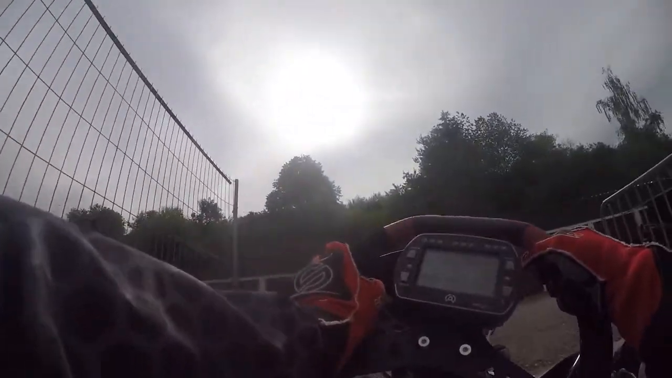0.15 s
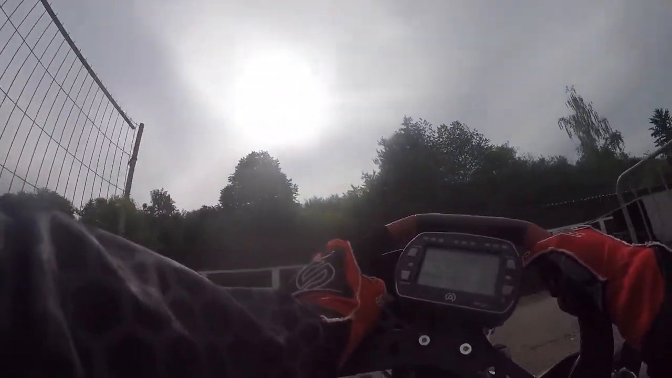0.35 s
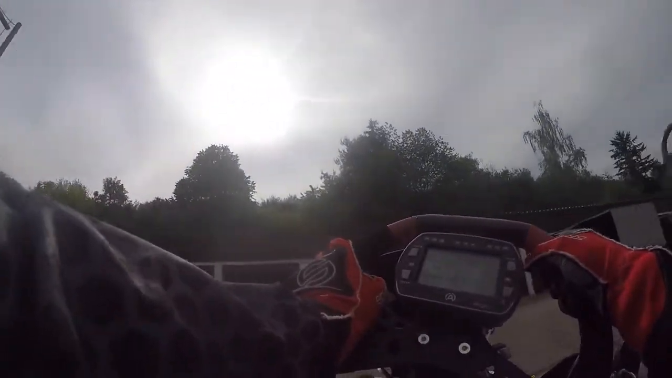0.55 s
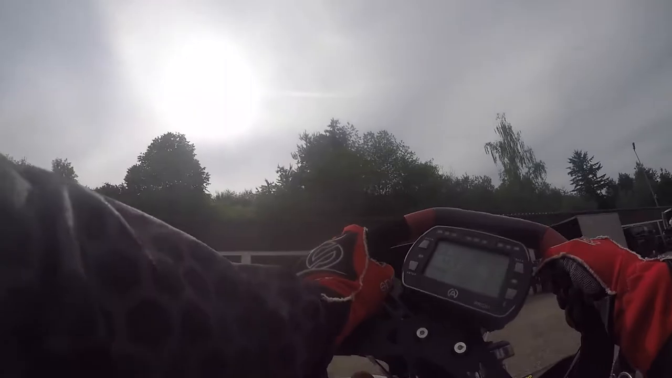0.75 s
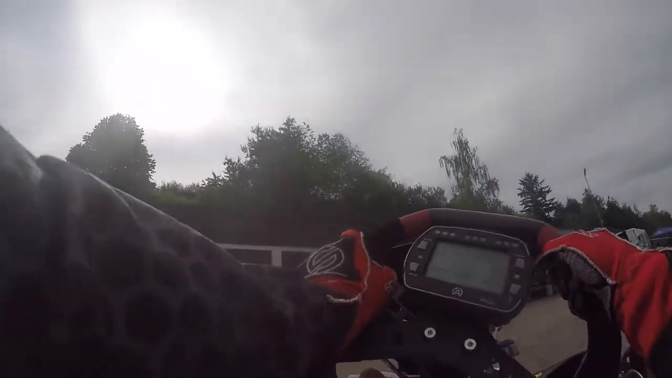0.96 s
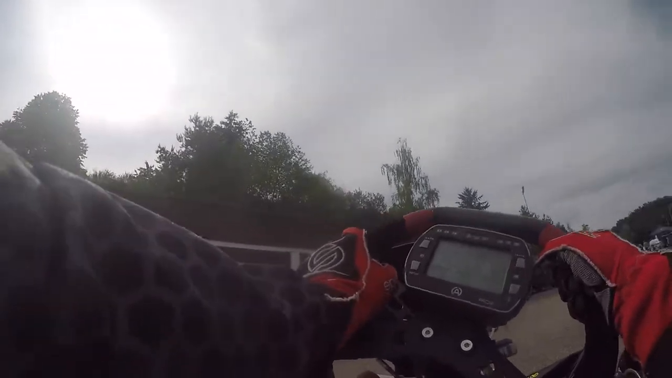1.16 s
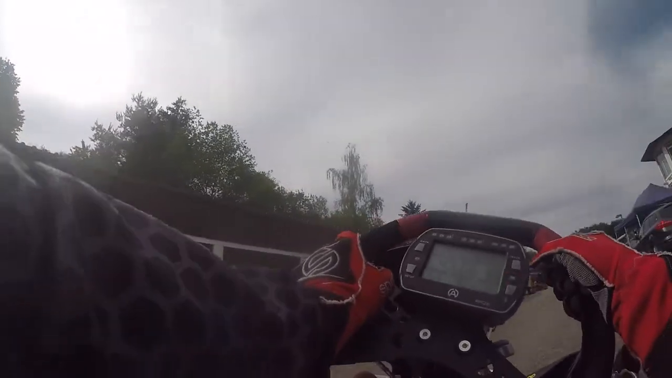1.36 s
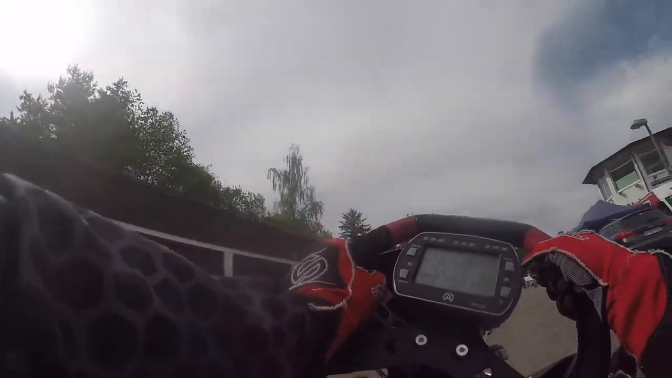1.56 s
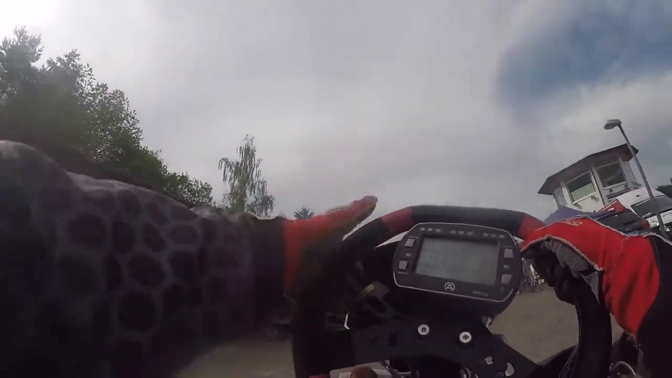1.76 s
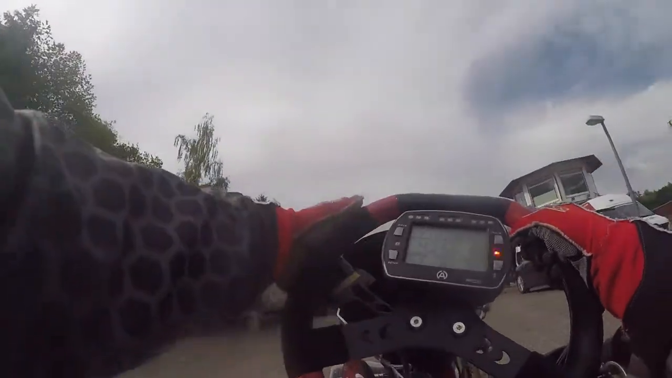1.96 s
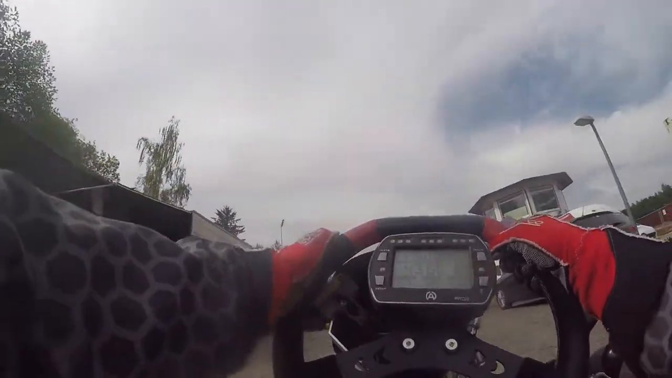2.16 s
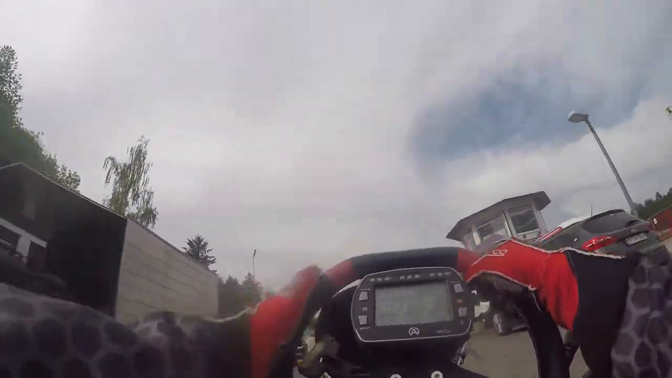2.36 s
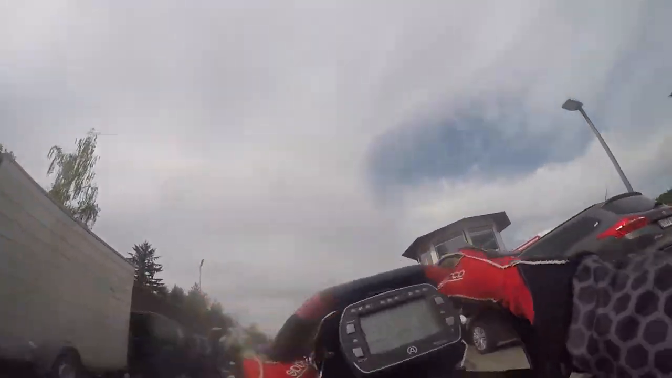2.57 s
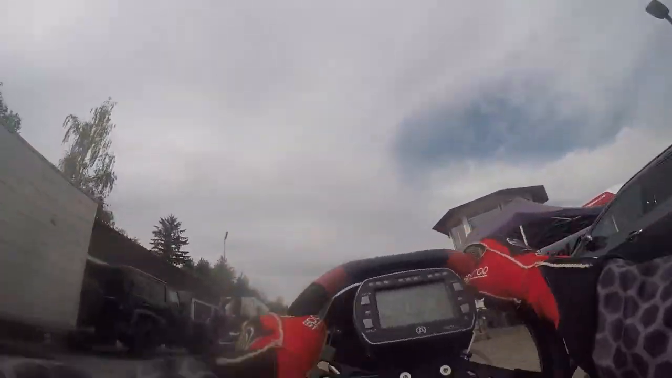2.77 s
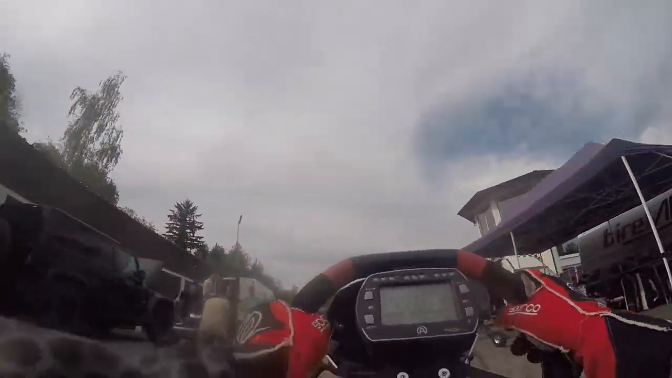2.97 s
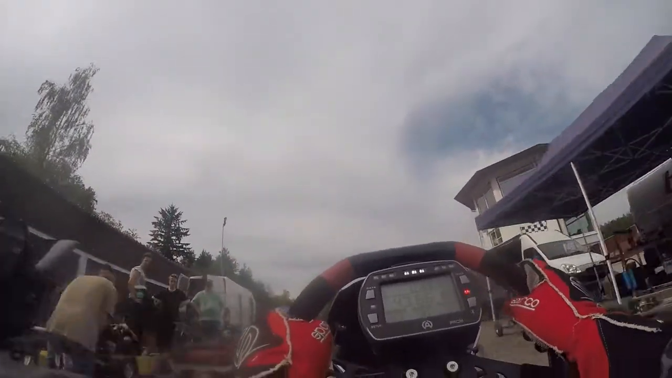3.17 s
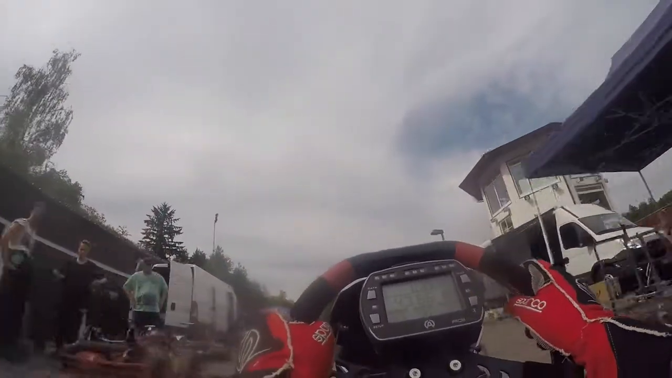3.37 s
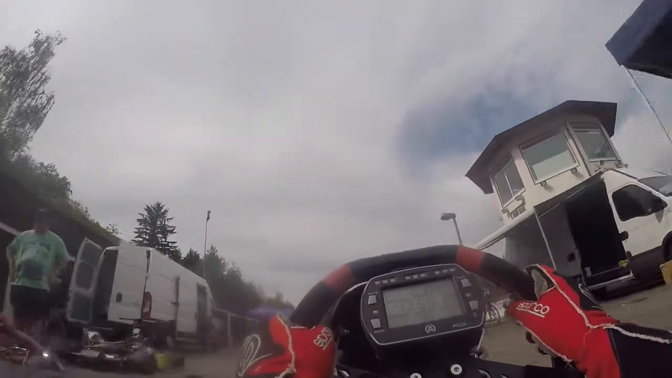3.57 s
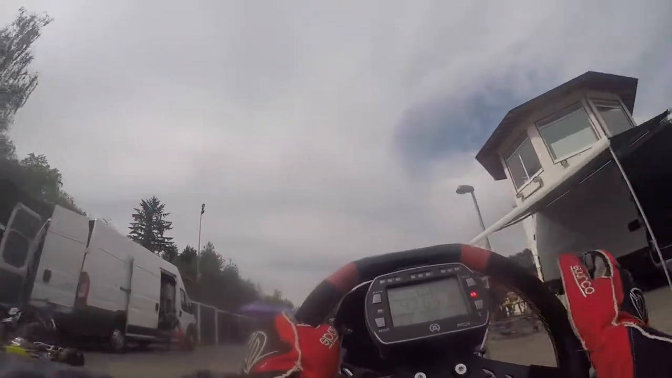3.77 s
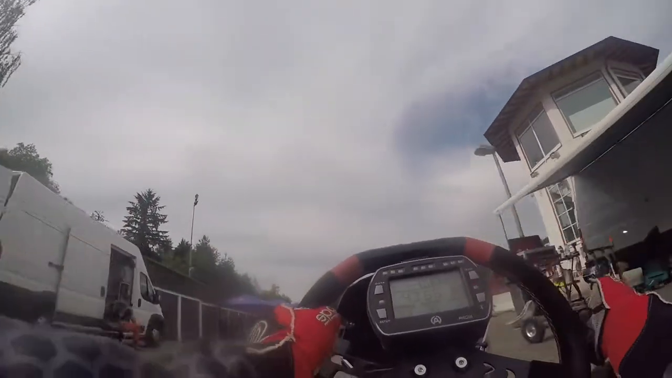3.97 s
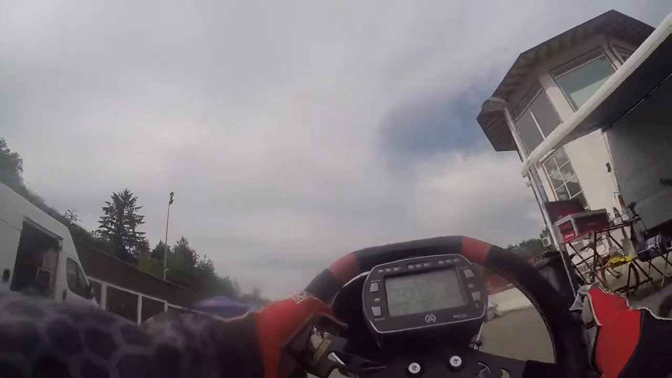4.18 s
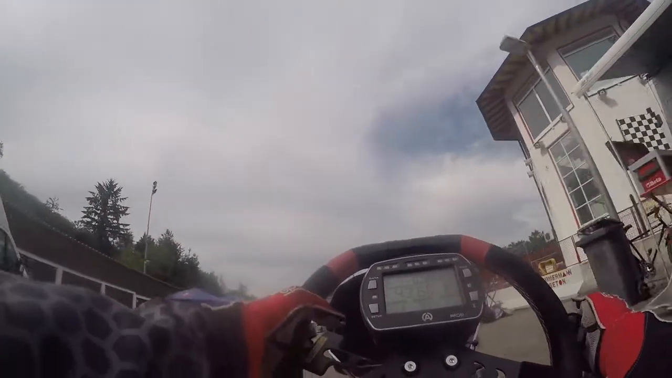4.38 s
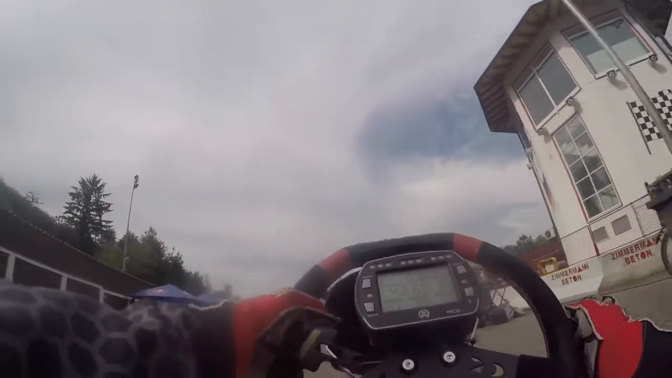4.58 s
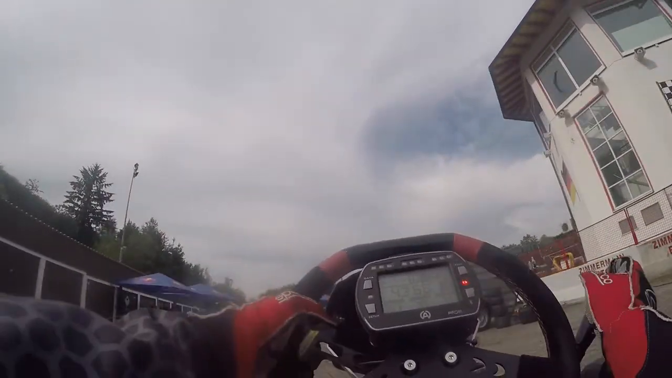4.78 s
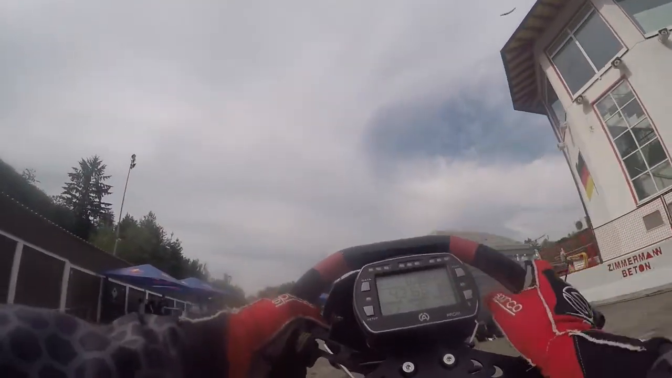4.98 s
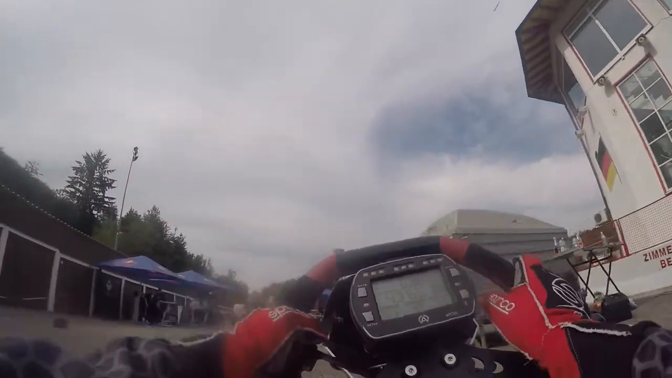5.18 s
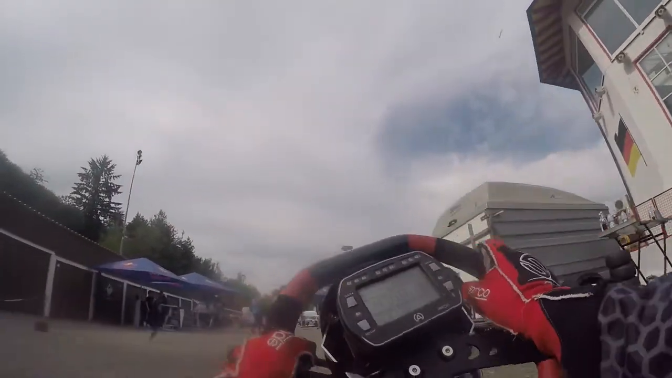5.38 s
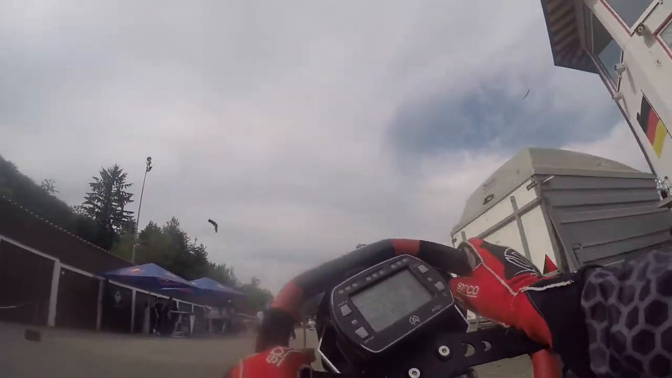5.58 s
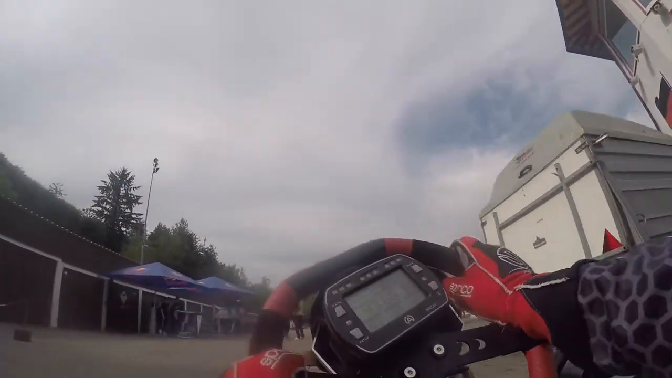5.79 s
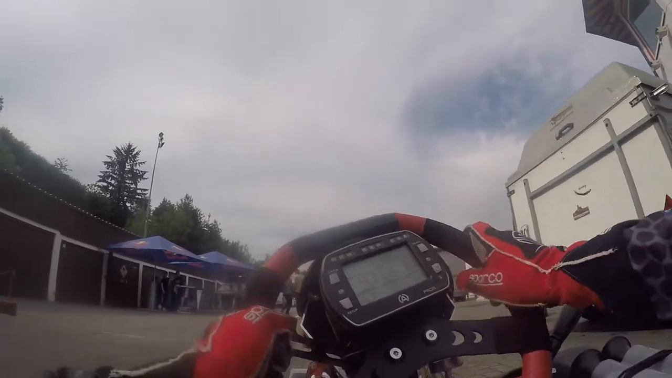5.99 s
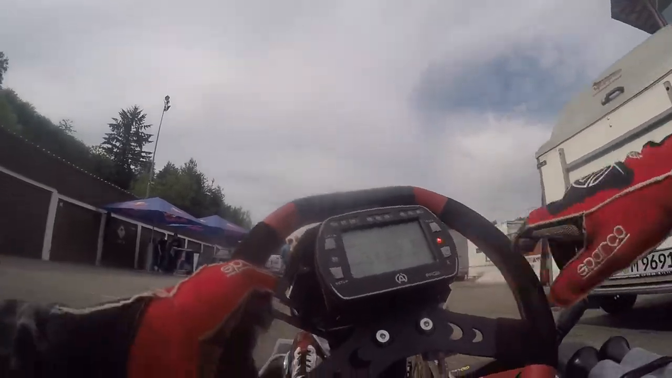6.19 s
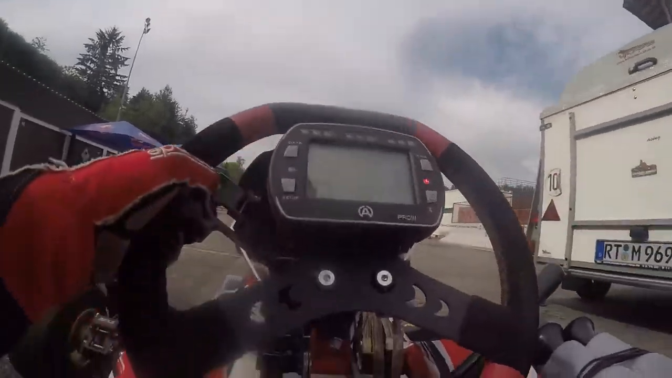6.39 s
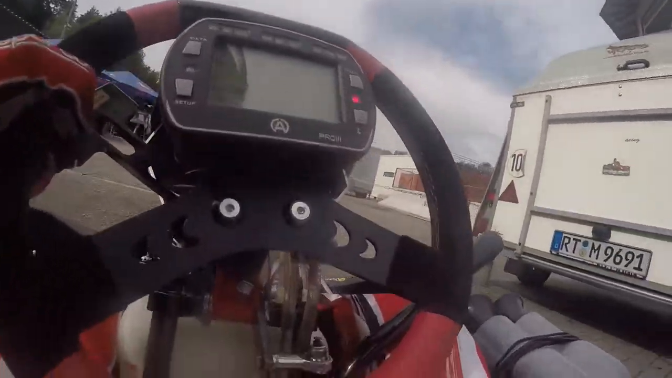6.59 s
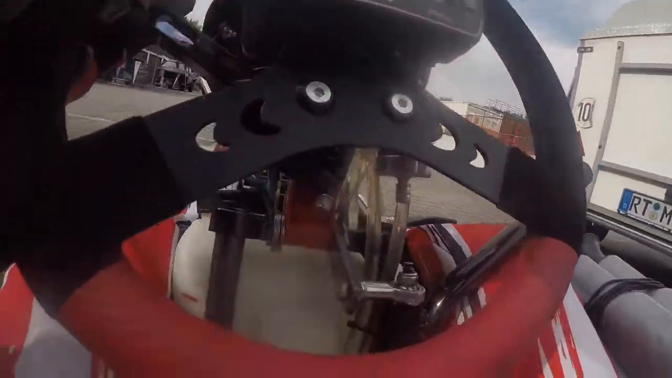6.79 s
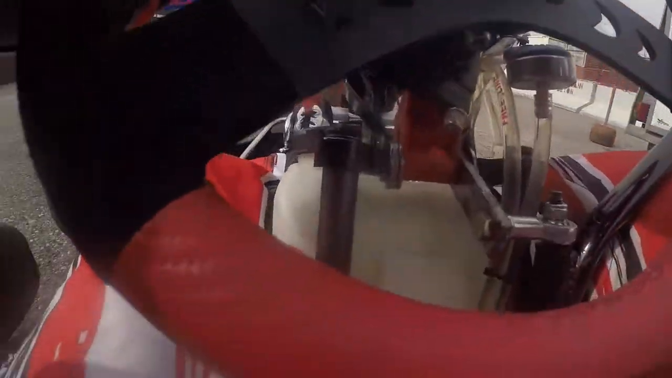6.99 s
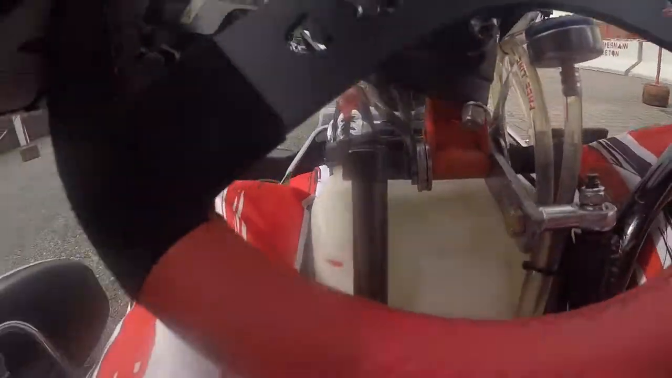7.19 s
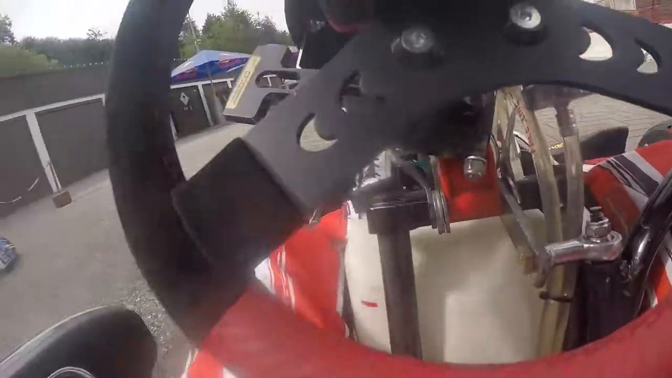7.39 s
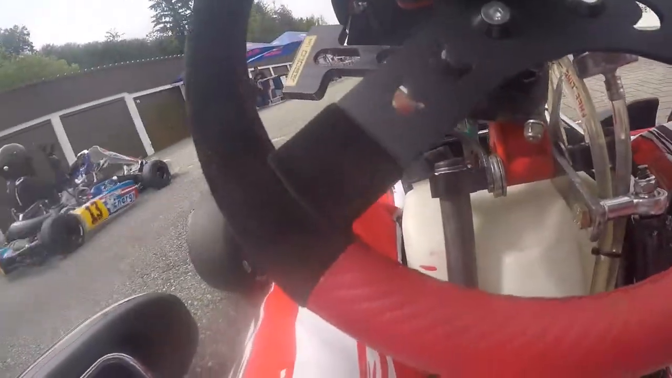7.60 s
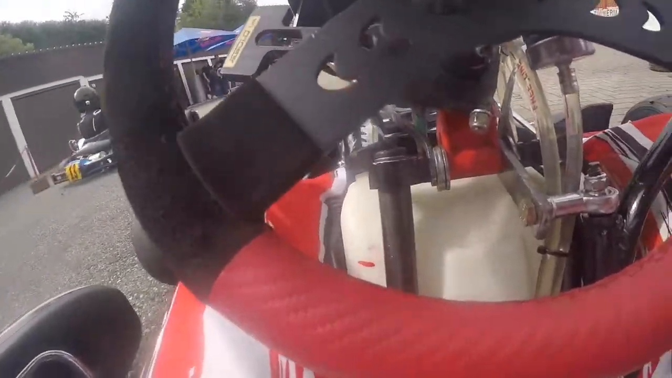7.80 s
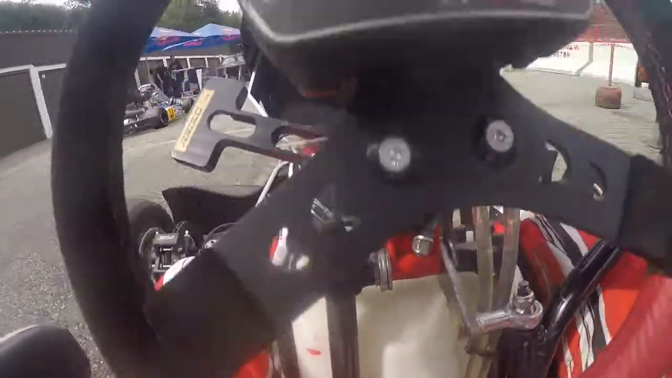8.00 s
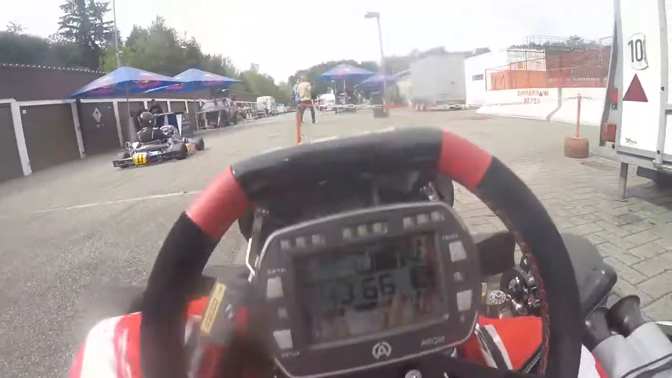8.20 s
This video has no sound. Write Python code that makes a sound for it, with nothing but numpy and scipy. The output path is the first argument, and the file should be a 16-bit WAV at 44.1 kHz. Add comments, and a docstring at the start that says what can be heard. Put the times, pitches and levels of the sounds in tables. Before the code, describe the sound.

Close on-board sound of a two-stroke kart trundling outdoors: a deep boomy hum with soft pops and low chassis drumming. It is suddenly blipped to a harsh high scream, then rasps down in uneven bursts and dies. The clutch drum sings and clacks ever slower. A second kart rolls past with a throbbing rasp and bright chain slaps, as jolts thump the microphone.

```python
"""A two-stroke kart heard on board: it trundles, is blipped to high revs, fires in bursts on the overrun and dies.
Its engine is crank-order sines through the mount, exhaust pulses through a pipe, intake clicks and casing noise.
Filtered noise gives wind, bumps and chassis drumming under it; jolts add damped low sines, knocks ring the frame.
As the engine dies its clutch sings and clacks once a turn, through resonances of the drum.
Another kart rolls past: low orders, throbbing rasp, ringing covers, a hollow swell and chain slaps."""
import sys
import numpy as np
from scipy.fft import rfft, irfft, next_fast_len
from scipy.io import wavfile
from scipy.ndimage import uniform_filter1d, map_coordinates

SR = 44100
rng = np.random.default_rng(int(sys.argv[2]) if len(sys.argv) > 2 else 0)


def master(y):
    """Save y as 16-bit WAV."""
    cut = np.clip(np.atleast_2d(y).T, -1, 1)
    pcm = np.round(cut * 32767)  # scale
    wavfile.write(sys.argv[1], SR, pcm.astype(np.int16))


N = 363825


def amp(db):
    """Amplitude ratio of a level in dB."""
    return 10 ** (np.asarray(db) / 20)


def unit(x):
    """Scale to an RMS of 1."""
    return x / np.sqrt(np.mean(x ** 2) + 1e-20)


def curves(rows):
    """One value per sample for each column after the time."""
    time_s, *columns = np.transpose(rows)
    return [np.interp(np.arange(N) / SR, time_s, column) for column in columns]


def window(start_s, end_s, fade_s):
    """Gain 1 between two times, with soft edges."""
    t = np.arange(N) / SR
    return np.clip(np.minimum(t - start_s, end_s - t) / fade_s + .5, 0, 1)


def wobble(rate_hz):
    """Smooth random curve with rate_hz knots a second."""
    at = np.arange(0, N + 64, 64)
    knots = rng.standard_normal(int(N * rate_hz / SR) + 4)
    return np.interp(np.arange(N), at, map_coordinates(knots, [at * rate_hz / SR]))


def filtered(x, response):
    """Multiply the spectrum of x by a complex response of frequency."""
    m = next_fast_len(N + SR // 2)
    return irfft(rfft(x, m) * response(np.fft.rfftfreq(m, 1 / SR)), m)[:N]


def along(points, hz):
    """Interpolate (freq_hz, level_db) points on a log frequency axis."""
    freq_hz, level_db = np.transpose(points)
    return np.interp(np.log(hz + 1), np.log(freq_hz + 1), level_db)


def shaped(points):
    """Zero-phase gain through (freq_hz, gain_db) points."""
    return lambda hz: amp(along(points, hz))


def resonant(modes):
    """Causal response of parallel (freq_hz, width_hz, gain_db) resonances, signs alternating."""
    def response(f):
        total = 0
        for k, (c, width, db) in enumerate(modes):
            total = total + (-1) ** k * amp(db) * 1j * f * width / (c * c - f * f + 1j * f * width)
        return total
    return response


def puffs(turns, scatter_db, decay_turns, rest):
    """Noise that bursts once a turn at a new size and decays towards a steady rest level."""
    size = amp(scatter_db * rng.standard_normal(int(turns[-1]) + 2))[turns.astype(int)]
    envelope = rest + size * np.exp(-(turns % 1) / decay_turns)
    return unit(envelope * rng.standard_normal(N))


def orders(turns, levels_db, flutter_db):
    """Sines on whole multiples of a rotation, each a little unsteady; levels are RMS."""
    out = np.zeros(N)
    for k, db in enumerate(levels_db):
        gain = np.sqrt(2) * amp(db + flutter_db * wobble(25))
        out += gain * np.sin(2 * np.pi * (k + 1) * turns + k)
    return out


def impulses(at, size):
    """Clicks at fractional sample positions, each split between two samples."""
    whole, part = at.astype(int), at % 1
    early = np.bincount(whole, size * (1 - part), N + 2)
    late = np.bincount(whole + 1, size * part, N + 2)
    return (early + late)[:N]


# crank speed: time_s, speed_turns_per_s
CRANK_SPEED = [(0, 91), (.7, 91.5), (1.16, 98), (1.84, 103), (2.08, 98), (2.14, 104.4), (2.25, 155.5),
               (2.31, 204.7), (2.37, 221.9), (2.45, 203), (2.56, 205), (2.67, 180.5), (2.73, 201.7),
               (2.81, 220.4), (2.92, 222), (3.09, 200.5), (3.16, 206), (3.29, 205.3), (3.67, 183.7),
               (4.16, 150.8), (4.67, 105), (4.81, 99), (5.16, 80), (5.7, 61), (6.4, 39)]
REFERENCE_HZ = 100  # crank speed at which BARK_DB holds
BARK_DB, BARK_DB_PER_OCTAVE = -38, 8.5  # exhaust with a weak charge


def engine():
    """One crank drives shake, exhaust, casing, pops, cylinder head and intake."""
    hz = curves(CRANK_SPEED)[0]
    turns = np.cumsum(hz * (1 + .003 * wobble(30))) / SR
    hard_db = firing()
    bark_db = BARK_DB + BARK_DB_PER_OCTAVE * np.log2(hz / REFERENCE_HZ) + hard_db + 1.02 * wobble(3.964)
    gas = puffs(turns, scatter_db=4.0, decay_turns=1.0, rest=1.0)
    whole_turns = np.arange(1, int(turns[-1]))
    turn_at = np.interp(whole_turns, turns, np.arange(N))  # sample position of each turn
    out = mount_shake(turns, hz, hard_db) + amp(bark_db) * exhaust(turns, hz, gas)
    out += casing(turns, hard_db) + throttle_pops(turn_at, gas)
    out += cylinder_head(gas, bark_db) + intake(turns, turn_at)
    return window(-1, 6.76, 0.27) * out


# runs of hard firing: start_s, length_s, gain_over_weak_charge_db
HARD_BURSTS = [(2.202, .23, 8.5), (2.432, 0.13, 9.5), (2.568, 0.19, 3.5), (2.709, 0.21, 6),
               (3.185, 0.059, 6.5), (3.4, 0.13, 10), (3.594, .13, 10), (3.938, 0.072, 7),
               (4.052, 0.25, 6.5), (4.32, 0.28, 3), (4.655, 0.061, 6.5), (4.802, 0.036, 7.5)]
BURST_EDGE_S, BURST_SAG_DB_PER_S = 0.022, 10.5


def firing():
    """dB that the runs of hard firing add; each sags as it goes on."""
    t = np.arange(N) / SR
    hard_db = np.zeros(N)
    for start_s, length_s, db in HARD_BURSTS:
        sagging_db = db - BURST_SAG_DB_PER_S * (t - start_s)
        hard_db += window(start_s, start_s + length_s, BURST_EDGE_S) * sagging_db
    return hard_db


# first order, once a turn: time_s, level_db
FIRST_ORDER = [(0, -12.5), (.76, -12.5), (.82, -20.5), (.9, -11.5), (.99, -22.5), (1.1, -11.5), (2.2, -12),
               (2.37, -22), (2.6, -19), (3.04, -23.5), (3.46, -9.5), (3.79, -21.5), (4.12, -12.5),
               (4.34, -9.5), (4.67, -16.5), (4.78, -12), (5.2, -13.5), (5.45, -18.5), (5.75, -10),
               (5.9, -13), (6.05, -28), (6.32, -24.5)]
# second order, twice a turn: time_s, level_db
SECOND_ORDER = [(0, -27), (.7, -28), (1.2, -35.5), (1.7, -28), (2.05, -46), (2.22, -29), (2.4, -38.5),
                (3.4, -38.5), (3.79, -26.5), (4.01, -37.5), (4.2, -20), (4.5, -34.5), (5.22, -44),
                (5.33, -26.5), (5.66, -23.5), (5.88, -31), (6.1, -24), (6.25, -37)]
# third order through the mount: order_freq_hz, level_db
THIRD_ORDER = [(120, -59), (185, -36.5), (235, -53.5), (300, -38.5), (400, -45.5), (490, -47), (570, -39),
               (660, -45.5)]
THIRD_SHARE = 1.13  # of a burst's dB


def mount_shake(turns, hz, hard_db):
    """Crank imbalance shakes the microphone through its mount at orders 1 to 3."""
    first_db = curves(FIRST_ORDER)[0]
    second_db = curves(SECOND_ORDER)[0] + 2.5 * wobble(8)
    third_db = along(THIRD_ORDER, 3 * hz) + THIRD_SHARE * hard_db + 3 * wobble(8)
    return orders(turns, [first_db, second_db, third_db], flutter_db=1.23)


# exhaust pipe resonances: freq_hz, width_hz, gain_db
PIPE_MODES = [(587, 136, -2.5), (870, 287, 1), (1046, 444, 0.5), (1830, 796, 0.5), (2345, 660, -0.5),
              (2930, 340, -8.5), (3670, 880, -13.5)]
# evenness of firing: time_s, clean_pulse_share_0_to_1 (amplitude weight)
EVENNESS = [(0, .1), (2.15, .15), (2.45, .65), (2.8, .8), (3, .62), (4, .65), (4.15, .78), (4.5, .6),
            (5.2, .2), (6.4, .15)]


def exhaust(turns, hz, gas):
    """One pulse a turn through the pipe: even pulses give orders, uneven ones give rasp."""
    def muffled(f):
        # rasp is thin in the bass; the silencer swallows the treble
        return resonant(PIPE_MODES)(f) / (1 + (f / 4500) ** 4) * f / np.hypot(f, 550)

    clean = curves(EVENNESS)[0]
    tones = pulse_orders(turns, hz, PIPE_MODES, flutter_db=3.2, slip_rad=.015)
    rasp = unit(filtered(gas, muffled))
    return clean * tones + np.sqrt(1 - clean ** 2) * rasp


def pulse_orders(turns, hz, modes, flutter_db, slip_rad, end_order=22):
    """Orders above the third of a pulse train through resonances, each coming and going.

    Higher orders slip further in phase because no two blowdowns have the same shape."""
    grid_hz = np.arange(0, 6000, 10.)
    response = abs(resonant(modes)(grid_hz)) / (1 + (grid_hz / 2600) ** 2)
    out = np.zeros(N)
    for k in range(4, end_order):
        phase = 2 * np.pi * k * turns + .25 * k * k + slip_rad * k ** 1.5 * wobble(35)
        out += amp(flutter_db * wobble(14)) * np.interp(k * hz, grid_hz, response) * np.sin(phase)
    power = uniform_filter1d(out ** 2, size=SR // 4)
    return out / np.sqrt(np.abs(power) + 1e-12)  # level held even over 0.25 s


# hiss spectrum: freq_hz, gain_db
HISS_SPECTRUM = [(1650, -17.5), (2800, -2.5), (4040, -2.5), (4760, -7.5), (5440, -3.5), (8490, -15.5),
                 (12000, -20), (15200, -28.5)]
# cylinder fins and covers: freq_hz, width_hz, gain_db
CASING_MODES = [(4040, 390, 1), (5480, 155, 16), (6790, 140, -0.5), (9460, 34, 5), (11600, 83, -18)]
# casing noise between bursts: time_s, hiss_gain_db, top_level_db
CASING_LEVELS = [(0, -49, -63), (2.1, -48.5, -58.5), (2.3, -31, -44), (2.6, -37, -47.5),
                 (2.92, -34.5, -44.5), (2.97, -35, -51.5), (4.2, -34.5, -50.5), (4.6, -42, -60.5),
                 (4.9, -50, -71), (5.5, -53, -77), (6.1, -61, -69), (6.4, -56, -68)]
HISS_SHARE = 0.2  # of a burst's dB


def casing(turns, hard_db):
    """Chatter puffing once a turn hisses and rings the fins and covers; its top end has its own level."""
    hiss_db, top_db = curves(CASING_LEVELS)
    hiss_db = hiss_db + HISS_SHARE * hard_db + 0.9 * wobble(3.8)
    top_db = top_db + HISS_SHARE * hard_db
    chatter = puffs(turns, scatter_db=2.5, decay_turns=0.88, rest=1.0)
    hiss = unit(filtered(chatter, shaped(HISS_SPECTRUM)))
    hiss += 0.69 * unit(filtered(chatter, resonant(CASING_MODES)))
    above = shaped([(6500, -30), (9000, -1.0)])
    body = filtered(hiss, lambda f: 1 - above(f))
    return amp(hiss_db) * body + amp(top_db) * unit(filtered(hiss, above))


# off-throttle pops: time_s, level_db
POP_LEVEL = [(0, -38), (1.6, -42.5), (2.1, -47)]


def throttle_pops(turn_at, gas):
    """Off throttle the charge lights only every second turn, now and then every third."""
    lit = np.cumsum(2 + (rng.standard_normal(len(turn_at)) > 1.4))
    lit = lit[lit < len(turn_at)]
    clicks = impulses(turn_at[lit], amp(1.8 * rng.standard_normal(len(lit))))
    modes = resonant([(1090, 340, 0), (2050, 500, -9)])
    pops = unit(filtered(clicks + 0.013 * gas, lambda f: modes(f) ** 2))
    return window(-1, 2.5, 0.1) * amp(curves(POP_LEVEL)[0]) * pops


# wind and bump buffeting: time_s, level_db
BUFFET_LEVEL = [(0, -23), (.82, -29), (1.5, -44), (2.25, -34), (2.6, -33), (2.8, -23), (4.37, -18.5),
                (4.55, -35.5), (5.45, -21.5), (6.2, -31.5), (7.3, -24.5), (7.65, -37), (8.25, -22)]
# buffeting spectrum: freq_hz, gain_db
BUFFET_SPECTRUM = [(10, -47), (22, 12.5), (30, 4.5), (50, 0), (80, -6.5), (160, -20), (400, -63.5)]
JOLT_RUMBLE_DB, JOLT_RUMBLE_S = -10, 0.056  # relative to the jolt's table level; time constant


def buffet():
    """Wind and bumps push the microphone in slow lumps, with a rumble swelling around each jolt."""
    t = np.arange(N) / SR
    jolts = np.zeros(N)
    for start_s, db in JOLTS:
        jolts += amp(db + JOLT_RUMBLE_DB) * np.exp(-abs(t - start_s - .02) / JOLT_RUMBLE_S)
    lumps = amp(0.76 * wobble(11)) * filtered(rng.standard_normal(N), shaped(BUFFET_SPECTRUM))
    return (amp(curves(BUFFET_LEVEL)[0]) + jolts) * unit(lumps)


# chassis and tyre drumming: time_s, level_db
ROLL_LEVEL = [(0, -21.5), (1.1, -22), (1.25, -26.5), (2.1, -26.5), (2.3, -23.5), (3.2, -21.5), (4.5, -26),
              (5.6, -28.5), (6.1, -38), (8.25, -40.5)]
# drumming spectrum: freq_hz, gain_db
CHASSIS_SPECTRUM = [(30, -6.5), (60, 1), (120, -3.5), (200, -7.5), (330, -16), (450, -25.5), (900, -55.5)]


def rolling():
    """The rolling chassis and tyres drum as unsteady low noise."""
    drumming = amp(3.1 * wobble(8.1)) * filtered(rng.standard_normal(N), shaped(CHASSIS_SPECTRUM))
    return amp(curves(ROLL_LEVEL)[0]) * unit(drumming)


# jolts: start_s, level_db
JOLTS = [(1.011, -7), (2.36, -2.5), (3.109, -15), (6.741, -12), (7.075, -10), (7.413, -9), (7.546, -11),
         (7.755, -10), (7.924, -13), (8.069, -12)]


def bumps():
    """Each jolt swings the microphone through a few slow, damped cycles."""
    out, t = np.zeros(N + SR), np.arange(SR // 4) / SR
    for start_s, db in JOLTS:
        hz = 34 * amp(0.99 * rng.standard_normal())
        envelope = (t / 0.035) * np.exp(1 - t / 0.024)
        out[round(start_s * SR):][:len(t)] += amp(db) * envelope * np.sin(2 * np.pi * hz * t)
    return out[:N]


def cylinder_head(gas, bark_db):
    """Hard firings ring the cylinder head; its level falls 2.8 dB per dB of exhaust, so weak ones barely do."""
    ring = unit(filtered(gas, lambda f: resonant([(4150, 450, 0)])(f) ** 2))
    return amp(2.8 * (bark_db + 21.5) - 37) * ring


# open throttle: time_s, scream_level_db, order_8_whine_level_db
THROTTLE_LEVELS = [(2.25, -37, -27), (2.37, -30, -28), (2.47, -33.5, -34), (2.66, -30.5, -27.5),
                   (2.84, -27, -24), (2.95, -50, -32)]
# intake resonances: freq_hz, width_hz, gain_db
INTAKE_MODES = [(2380, 220, 0), (2630, 160, 0), (3050, 200, -6)]


def intake(turns, turn_at):
    """Open throttle: one click a turn rings the intake, with a sine whine at order 8."""
    scream_db, whine_db = curves(THROTTLE_LEVELS)
    clicks = impulses(turn_at, amp(rng.standard_normal(len(turn_at))))
    scream = unit(filtered(clicks, lambda f: resonant(INTAKE_MODES)(f) / (1 + (f / 4500) ** 4)))
    whine = np.sqrt(2) * np.sin(2 * np.pi * 8 * turns)
    return window(2.24, 2.97, 0.11) * (amp(scream_db) * scream + amp(whine_db) * whine)


# clutch drum rubbing: time_s, level_db
DRAG_LEVEL = [(5.2, -56.5), (5.6, -47), (6.1, -49.5), (6.5, -46.5), (7.1, -44.5)]
# clutch drum resonances: freq_hz, width_hz, gain_db
DRUM_MODES = [(2660, 290, -4), (3986, 130, 2.5), (4570, 200, -3.5), (5380, 34, 1.5), (6330, 120, -6.5),
              (8400, 250, -30), (9250, 160, -28), (9770, 410, -10.5), (10560, 360, -22), (13400, 400, -44)]
# clacks: time_s, level_db
CLACK_LEVELS = [(6.26, -49.5), (6.55, -39), (6.75, -32.5), (7.1, -31.5), (7.16, -42)]
FIRST_CLACK_S, FIRST_CLACK_HZ, RUNDOWN_S, CLACK_COUNT = 6.259, 45.31, 1.036, 28  # RUNDOWN_S: time constant


def clutch():
    """The drum sings while it drags, then clacks once a turn as the crank labours over compression."""
    push, t = np.zeros(N), np.arange(SR // 20) / SR
    turn = np.arange(CLACK_COUNT)
    # exponentially slowing crank
    times_s = FIRST_CLACK_S - RUNDOWN_S * np.log(1 - turn / (FIRST_CLACK_HZ * RUNDOWN_S))
    for start_s in times_s:
        db = np.interp(start_s, *np.transpose(CLACK_LEVELS)) + 1.1 * rng.standard_normal()
        push[round(start_s * SR):][:len(t)] += amp(db) * (t / 0.0072) * np.exp(1 - t / 0.0068)
    clacks = push * rng.standard_normal(N)
    rub = filtered(rng.standard_normal(N), lambda f: 1 / (1 + (f / 11000) ** 8))
    drag = amp(curves(DRAG_LEVEL)[0]) * window(5.2, 7.1, 0.14) * rub
    ring = resonant(DRUM_MODES)
    rung = filtered(clacks + drag, lambda f: ring(f) / np.sqrt(np.mean(abs(ring(f)) ** 2)))
    bare = filtered(clacks, shaped([(1000, -27), (2500, -7), (10000, 0.5), (15000, -5)]))
    return rung + 0.32 * bare


# knocks: start_s, frame_drive_db, bare_crack_db
KNOCK_LEVELS = [(5.433, -16.5, -65), (7.299, -4.5, -34)]
# frame tubes: freq_hz, width_hz, gain_db
FRAME_MODES = [(1100, 500, -3.5), (1740, 460, 3), (2560, 30, 11.5), (4570, 900, -15), (6240, 120, -4.5)]


def knocks():
    """Short hard noise bursts, 60 dB down in 41 ms, ring the frame over a bare crack."""
    out, t = np.zeros((2, N)), np.arange(SR // 10) / SR
    for start_s, frame_db, crack_db in KNOCK_LEVELS:
        burst = amp(-60 * t / 0.041) * rng.standard_normal((2, len(t)))
        out[:, round(start_s * SR):][:, :len(t)] += burst * amp([[frame_db], [crack_db]])
    frame, crack = out
    return filtered(frame, resonant(FRAME_MODES)) + crack


# passing kart: time_s, firing_rate_hz, order_1_db, order_2_db, order_3_db, rasp_db, treble_db
PASSING_KART = [(6.3, 124, -52, -63, -63, -47.5, -51), (6.46, 114, -37, -49, -75.5, -44, -46),
                (6.79, 128.3, -41.5, -40.5, -56.5, -41, -63), (7.35, 122, -29, -37, -51.5, -33, -40),
                (7.51, 126.1, -35, -34, -37.5, -29.5, -29.5), (8.16, 127, -56, -51.5, -47.5, -32.5, -45),
                (8.25, 150, -39, -52, -50, -32.5, -38.5)]
# rasp spectrum: freq_hz, gain_db
RASP_SPECTRUM = [(88, -45), (150, 11.5), (182, -10), (253, 3), (300, 2.5), (374, -1), (665, -7),
                 (1360, 0.5), (2690, -7.5), (3400, -17), (4420, -43), (7480, -120)]
# treble rasp spectrum: freq_hz, gain_db
TREBLE_SPECTRUM = [(1760, -42), (3000, -4.5), (3210, -16.5), (3930, -4.5), (4210, -9), (6680, -6),
                   (7340, -17.5), (10200, -19), (12400, -21), (15200, -38)]
# its ringing parts: freq_hz, width_hz, gain_db
COVER_MODES = [(1370, 48, -4), (2046, 80, 5), (2304, 53, 7.5), (2644, 105, 7), (2760, 49, -8),
               (3430, 150, -3.5), (3880, 110, -2), (5150, 52, -1.5), (6660, 170, -18.5)]
# hollow swell near 1 kHz: time_s, level_db
HOLLOW_LEVEL = [(6.7, -68), (6.95, -47), (7.1, -34.5), (7.35, -39.5), (7.5, -51), (8.25, -66)]


def passer():
    """A low drone, a rasp that throbs with the firings, ringing covers and a hollow swell."""
    hz, *orders_db, rasp_db, treble_db = curves(PASSING_KART)
    turns = np.cumsum(hz) / SR
    gas = puffs(turns, scatter_db=3.0, decay_turns=1.0, rest=1.0)
    rasp = unit(filtered(gas, shaped(RASP_SPECTRUM)))
    covers = np.zeros(N)
    for mode in COVER_MODES:  # each part comes and goes
        covers += filtered(gas * amp(3.5 * wobble(7)), resonant([mode]))
    treble = unit(filtered(gas, shaped(TREBLE_SPECTRUM)))
    near = amp(rasp_db) * (rasp + .95 * unit(covers)) + amp(treble_db) * treble * window(7.12, 9, 0.24)
    swell = unit(filtered(gas, lambda f: resonant([(990, 300, 0)])(f) ** 2))
    hollow = amp(curves(HOLLOW_LEVEL)[0]) * swell
    return window(6.31, 9, 0.34) * (orders(turns, orders_db, flutter_db=3.0) + near + hollow)


# chain slaps: start_s
SLAP_TIMES = [7.22, 7.298, 7.34, 7.394, 7.447, 7.505, 7.569, 7.638, 7.688, 7.733, 7.79, 7.849, 7.914, 7.979,
              8.026, 8.069, 8.124, 8.171, 8.236]
# chain links: freq_hz, width_hz, gain_db
LINK_MODES = [(12360, 630, 4.5), (12700, 400, -2.5), (13500, 500, -14), (14900, 500, -4),
              (9600, 900, -10.5)]
SLAP_DB, SLAP_FALL_POWER = -18.5, 1.7  # level at nearest, before scatter; fall with distance
NEAREST_S, NEAR_FOR_S = 7.71, 0.2  # NEAR_FOR_S: time to roll one nearest distance


def chain():
    """Each slap shakes the links for a moment, loudest around the kart's nearest point."""
    shake, t = np.zeros(N + SR), np.arange(SR // 10) / SR
    envelope = amp(-60 * t / 0.096) * (1 - np.exp(-t / 0.004))
    for start_s in SLAP_TIMES:
        distance = np.hypot(1, (start_s - NEAREST_S) / NEAR_FOR_S)
        size = amp(SLAP_DB + 2.3 * rng.standard_normal()) / distance ** SLAP_FALL_POWER
        shake[round(start_s * SR):][:len(t)] += size * envelope * rng.standard_normal(len(t))
    return filtered(shake[:N], resonant(LINK_MODES))


def scene():
    """Sum of all sources, one channel."""
    own_kart = engine() + buffet() + rolling() + bumps() + clutch() + knocks()
    return (own_kart + passer() + chain())[None]


BAND_LIMIT_HZ = 15315


def record(dry):
    """The microphone input saturates softly near 0.93 and passes nothing above its band limit."""
    soft = dry[0] / (1 + np.abs(dry[0] / .93) ** 8) ** (1 / 8)
    return filtered(soft, lambda hz: hz < BAND_LIMIT_HZ)[None]


dry = scene()
out = record(dry)
master(out)
```